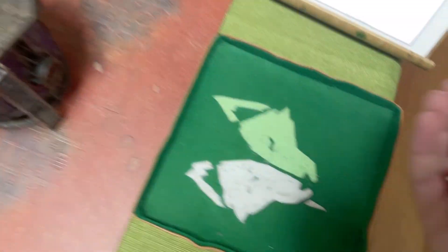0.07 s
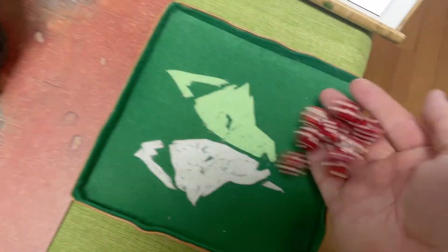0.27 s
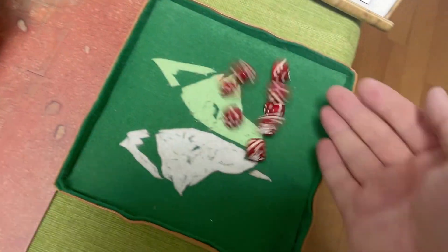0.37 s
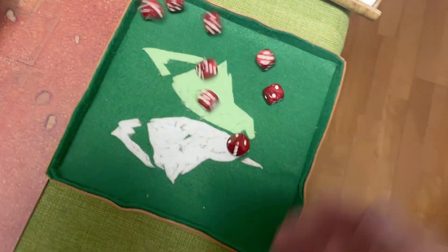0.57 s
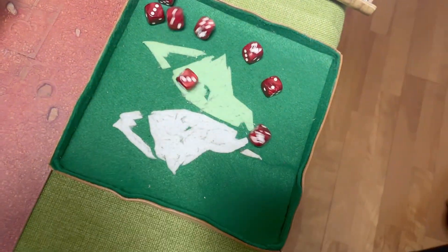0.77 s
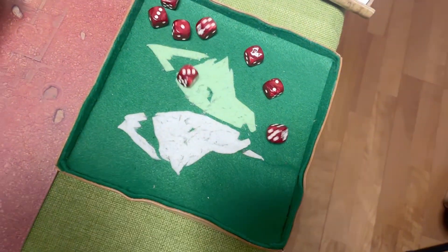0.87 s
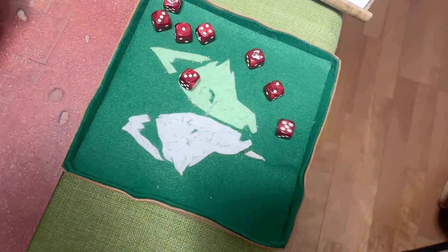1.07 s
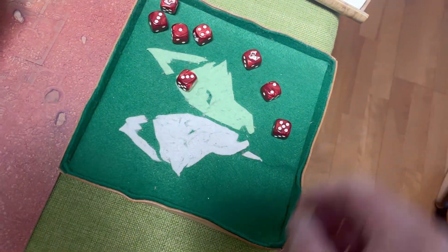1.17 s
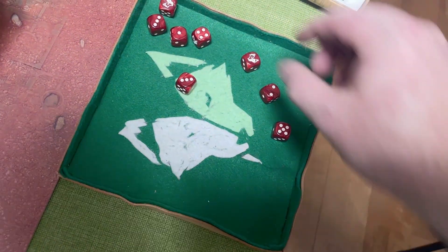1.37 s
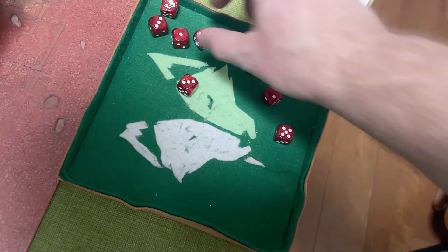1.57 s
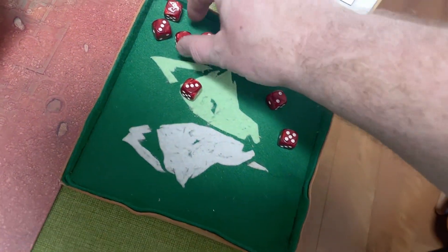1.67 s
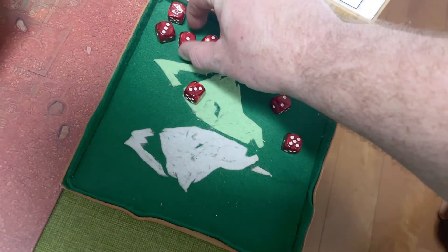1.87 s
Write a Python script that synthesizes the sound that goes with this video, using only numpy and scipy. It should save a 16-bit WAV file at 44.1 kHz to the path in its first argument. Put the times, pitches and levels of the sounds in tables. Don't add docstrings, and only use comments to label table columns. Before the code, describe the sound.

Plastic dice clack briefly in a palm, then spill onto a felt mat with sharp clicks, soft woody thuds and hard knocks, settling quickly; later an arm rustles and bumps furniture. Small quiet room, close stereo microphone.

```python
import sys
import numpy as np
from scipy import signal
from scipy.fft import rfft, irfft
from scipy.io import wavfile

SR = 44100
rng = np.random.default_rng(int(sys.argv[2]) if len(sys.argv) > 2 else 0)


def gain_from_db(level_db):
    decades = np.asarray(level_db, float) / 20
    return 10 ** decades


def dump_mix(stems):
    frames = np.atleast_2d(stems).T
    limited = np.clip(frames, -1, 1)
    pcm = np.round(limited * 32767).astype(np.int16)
    wavfile.write(sys.argv[1], SR, pcm)


N = 83790


def in_time(rows):
    return gain_from_db(np.interp(np.arange(N) / SR, *np.transpose(rows)))


def at_hz(points, hz):
    table_hz, value = np.transpose(points)
    return np.interp(np.log(hz + 1), np.log(table_hz + 1), value)


def rms_one(x):
    return x / np.sqrt(np.mean(x ** 2) + 1e-20)


def passed(x, kind, hz, order):
    return signal.sosfilt(signal.butter(order, hz, kind, fs=SR, output="sos"), x)


def rings(hz, t60_s, size):
    t = np.arange(size) / SR
    decay = gain_from_db(-60 * t / np.reshape(t60_s, (-1, 1)))
    return np.sin(2 * np.pi * np.reshape(hz, (-1, 1)) * t) * decay


def push(hz):
    force = np.hanning(int(SR / hz / 2) + 3)
    return force / force.sum()


def place(rows, shape):
    out = np.zeros(N + SR)
    for start_s, peak_db, *hz in rows:
        x = shape(*hz)
        start = int(start_s * SR)
        out[start:start + len(x)] += gain_from_db(peak_db) * x / np.abs(x).max()
    return out[:N]


def grains():
    lumps = np.minimum(rng.exponential(1, N // 60 + 1), 4)
    return rng.standard_normal(N) * gain_from_db(0.98 * lumps.repeat(60)[:N])


def diffuse(a, b, colour):
    # freq_hz, likeness [0..1]
    likeness = [(60, 1), (300, .8), (700, .3), (5500, .1), (7600, .8), (8700, .998), (9400, .99),
                (11500, .6), (13500, .99)]
    alike = np.clip(at_hz(likeness, np.fft.rfftfreq(2 * N, 1 / SR)), 0, 1)
    mid = np.sqrt(1 + alike) * a
    side = np.sqrt(1 - alike) * b * [[1], [-1]]
    return irfft(colour * (mid + side), 2 * N)[:, :N]


def noise(spectrum):
    a, b = rfft(rng.standard_normal((2, 2 * N)))
    return rms_one(diffuse(a, b, gain_from_db(at_hz(spectrum, np.fft.rfftfreq(2 * N, 1 / SR)))))


def clack(hz):
    size, cycles, scatter_db, scatter_t60_s = 300, 8.2, -27, .018
    vary = rng.uniform(-1, 1, 8)
    mode_hz = np.array([hz, hz * .72, 12400, hz * .42, 7800]) * (1 + .07 * vary[:5])
    mode_db = [0, -8, -10 + 3 * vary[5], -19.5, -6.0]
    t60_s = cycles * np.array([0.89, 0.44, 0.65, 0.45, 1]) / mode_hz
    x = gain_from_db(mode_db) @ rings(mode_hz, t60_s, size)
    x *= 1 - np.exp(-np.arange(size) * hz / SR)
    t = np.arange(600) / SR
    path = rng.standard_normal(600) * gain_from_db(scatter_db - 60 * t / scatter_t60_s)
    path[:25] = np.arange(25) == 0
    return passed(np.convolve(x, path), "high", 1200, order=4)


def palm_clacks():
    # start_s, peak_db, centre_hz
    palm_hits = [(0.0955, -34.3, 6700), (0.17, -21.5, 4580), (0.1719, -35.1, 4820), (0.1754, -32.3, 4390),
                 (0.178, -21.4, 6550), (0.1816, -36.2, 4610), (0.1841, -24.7, 5040), (0.1888, -28.8, 4940),
                 (0.1932, -33.1, 4760), (0.1949, -34.5, 5140), (0.1985, -25.8, 4720), (0.2001, -17.6, 4820),
                 (0.2059, -9.4, 5800), (0.2071, -15.0, 6840), (0.2095, -15.6, 5940), (0.2117, -29.2, 5600),
                 (0.2139, -29.2, 4920), (0.2156, -21.6, 5410), (0.2175, -30.3, 6590), (0.2186, -29.1, 6110),
                 (0.2212, -16.3, 6320), (0.2229, -26.7, 6040), (0.2244, -16.1, 4780), (0.2314, -20.0, 6560),
                 (0.2398, -26.9, 6020), (0.2413, -28.0, 5710), (0.2444, -8.8, 5510), (0.2548, -24.8, 7320),
                 (0.2587, -19.0, 6600), (0.2622, -27.0, 5680), (0.2637, -31.7, 6810), (0.2736, -31.4, 6080),
                 (0.2772, -33.1, 6560), (0.2784, -34.6, 5730)]
    return gain_from_db(5.5) * place(palm_hits, clack)


def mat_clacks():
    # start_s, peak_db, centre_hz
    mat_hits = [(0.3163, -19.7, 6120), (0.3188, -21.1, 6370), (0.322, -28.5, 5260), (0.3333, -11.5, 7150),
                (0.3388, -28.3, 6780), (0.3432, 0.3, 8240), (0.3443, 0.0, 7770), (0.3509, -18.8, 7870),
                (0.3528, -10.5, 7780), (0.3559, -19.7, 8540), (0.3594, -12.1, 7990), (0.3654, -7.0, 7600),
                (0.3688, -19.1, 7530), (0.3737, -22.8, 7580), (0.3771, -21.4, 7230), (0.3813, -23.1, 7000),
                (0.3829, -22.5, 8230), (0.3871, -8.7, 7200), (0.3891, -20.9, 7620), (0.3942, -1.3, 8260),
                (0.3963, -15.8, 8310), (0.3974, -22.6, 7320), (0.3989, -24.8, 7610), (0.4022, -22.9, 8050),
                (0.4039, -16.8, 8320), (0.4069, -21.5, 8100), (0.4094, -22.0, 8610), (0.4125, -23.6, 8430),
                (0.4135, -25.0, 8710), (0.4193, -25.3, 8470), (0.423, -27.2, 8140), (0.4323, -26.8, 8480),
                (0.5315, -11.9, 6980), (0.5412, -30.6, 6530), (0.564, -32.6, 3670), (0.5968, -19.6, 6050),
                (0.6633, -22.3, 6640), (0.6801, -18.1, 8410), (0.6849, -11.4, 8030), (0.6944, -31.1, 7130)]
    return gain_from_db(5.5) * place(mat_hits, clack)


def landing(hz):
    # freq_hz, level_db, t60_s
    table_modes = [(55.2, -21.5, 0.17), (70.53, -14, 0.78), (130.7, -4.5, 0.28), (163.3, -4, 0.15),
                   (210.5, 0, 0.053), (262, -9, 0.047), (323, -7, 0.017), (342, -13, 0.093),
                   (390, -19.5, 0.047)]
    mode_hz, mode_db, t60_s = np.transpose(table_modes)
    strength = gain_from_db(mode_db - 8.5 + rng.normal(0, 4, len(mode_hz)))
    x = -strength @ rings(mode_hz, t60_s, size=20000)
    x -= gain_from_db(-11) * rings(hz, 3.7 / hz, size=20000)[0]
    return signal.fftconvolve(x, push(hz * 2.4))


def landings():
    # start_s, peak_db, push_hz
    felt_hits = [(.3115, -14, 248), (.3245, -14, 308), (.3303, -13.5, 228), (.3365, -18, 258),
                 (.3595, -9.5, 280), (.366, -25, 175), (.3975, -19.5, 300), (.4035, -17.5, 187),
                 (.419, -18, 200), (.431, -18, 190), (.4505, -25.5, 227), (.4555, -27, 233.4),
                 (.4605, -23, 197), (.471, -30, 160.5), (.4915, -20, 230), (.5165, -35, 340),
                 (.5245, -23, 177), (.5675, -17, 206), (.6215, -44, 205), (.6435, -35, 198),
                 (.676, -30.5, 286), (.697, -33, 220), (.726, -41, 209), (.765, -44, 173)]
    return place(felt_hits, landing)


def knock(hz):
    t60_s = 0.02 * 1300 / hz * np.array([1, .6, .4])
    x = gain_from_db([0, -13, -12]) @ rings(hz * np.array([1, .62, 1.55]), t60_s, size=4000)
    return np.convolve(x, push(hz * 3))


def knocks():
    # start_s, peak_db, ring_hz
    corner_hits = [(.308, -19.5, 1310), (.351, -17, 1446), (.385, -12.5, 1278), (.483, -23, 1295),
                   (.512, -31, 530), (.563, -22, 1340), (.567, -25, 262), (.789, -31.5, 5760),
                   (.8555, -43, 2077), (.859, -47, 2700), (.882, -54, 4040), (1.498, -57, 1146)]
    return place(corner_hits, knock)


def thud():
    spread_s, top_hz = 0.1331, 330
    hz = np.fft.rfftfreq(4096, 1 / SR)
    lag_rad = 4 * np.pi * spread_s * np.sqrt(hz) - 2 * np.pi * hz * spread_s / 50
    gain = hz / (hz + 150) / (1 + (hz / top_hz) ** 2)
    return irfft(np.exp(-1j * lag_rad) * gain)[:2000]


def thuds():
    # start_s, peak_db
    board_hits = [
        (.308, -26),
        (.385, -23),
        (.563, -28),
    ]
    return place(board_hits, thud)


def tumble():
    # start_s, level_db
    tumble_curve = [(.3, -104), (.45, -58), (.64, -55), (.86, -62), (.94, -98.5)]
    centre_hz, width_hz = 1690, 140
    drag = grains()

    def band(lo_hz, hi_hz):
        return rms_one(passed(drag, "band", [lo_hz, hi_hz], order=2))

    resonance = band(centre_hz - width_hz / 2, centre_hz + width_hz / 2)
    hiss = gain_from_db(-1.5) * band(1300, 2000)
    patter = gain_from_db(-10.5) * band(220, 440)
    return in_time(tumble_curve) * (resonance + hiss + patter)


def bump(hz):
    # freq_hz, level_db, t60_s
    furniture_modes = [(355, 5, 0.069), (480, 1, 0.04), (590, 2, 0.03), (690, -2, 0.05), (945, -2, 0.035),
                       (1130, -3, 0.035), (1400, -7, 0.02), (1765, -1, 0.03), (2120, 3, 0.04),
                       (3140, -4, 0.04), (3610, -2, 0.03), (5310, -6, 0.04), (5750, -10, 0.05)]
    mode_hz, mode_db, t60_s = np.transpose(furniture_modes)
    count = len(mode_hz)
    vary = rng.normal(0, 1, (2, count))
    sign = np.where(mode_hz < 500, 1, rng.choice([-1, 1], count))
    strength = gain_from_db(mode_db + 2.5 * vary[0]) * sign
    x = strength @ rings(mode_hz * (1 + .015 * vary[1]), np.minimum(t60_s, .05), size=3000)
    x = np.convolve(passed(x, "high", 310, order=4), push(hz * 3.8))
    stutter = rng.standard_normal(400) ** 3 * np.exp(-np.arange(400) / 30)
    return np.convolve(x, stutter)


def bumps():
    # start_s, peak_db, hardness_hz
    arm_hits = [(1.1229, -23, 1500), (1.125, -22, 450), (1.143, -26, 500), (1.5835, -28, 900),
                (1.586, -15, 1700), (1.588, -12, 900), (1.592, -21, 1300), (1.6025, -13, 1200),
                (1.605, -18, 900), (1.617, -20, 500), (1.634, -20, 400)]
    return gain_from_db(-3) * np.array([place(arm_hits, bump) for _ in "LR"])


def shove(hz):
    x = gain_from_db([0, -6]) @ rings([hz, hz * 1.375], [.13, .1], size=9000)
    return np.convolve(x, push(hz * 1.255))


def shoves():
    # start_s, peak_db, push_hz
    weight_hits = [
        (1.126, -29, 106.3),
        (1.59, -27.5, 80.6),
        (1.612, -28, 87.4),
    ]
    return place(weight_hits, shove)


def brush():
    # start_s, level_db
    brush_curve = [(1.03, -99.5), (1.08, -71.5), (1.12, -54.5), (1.17, -62.5), (1.28, -95.5), (1.575, -82),
                   (1.588, -41), (1.64, -34), (1.71, -44), (1.78, -65.5), (1.88, -100.5)]
    # freq_hz, density_db_per_hz
    cloth_colour = [(120, -20.5), (200, -23), (3600, -29.5), (7970, -31), (9050, -25), (12700, -36),
                    (15000, -42.5)]
    creak = [rms_one(signal.fftconvolve(grains(), np.diff(bump(4000)))[:N]) for _ in "LR"]
    creak = passed(np.array(creak), "low", 6800, order=4)
    return in_time(brush_curve) * (noise(cloth_colour) + gain_from_db(-2) * creak)


def rustle():
    # start_s, level_db
    rustle_curve = [(0, -59.5), (.07, -65.5), (.16, -68.5), (.85, -93), (.858, -59), (.91, -81), (.94, -92),
                    (1.04, -79), (1.1, -52), (1.15, -55.5), (1.23, -70.5), (1.3, -117), (1.395, -86),
                    (1.41, -66), (1.47, -74), (1.5, -85)]
    friction = passed(np.array([grains(), grains()]), "band", [1000, 2700], order=2)
    return in_time(rustle_curve) * rms_one(friction)


def rumble():
    # start_s, level_db
    rumble_curve = [(0, -73), (.1, -64), (.29, -77), (.33, -28), (.6, -45), (.88, -70.5), (.97, -60.5),
                    (1.04, -71), (1.15, -47), (1.33, -77), (1.56, -69), (1.63, -52.5), (1.82, -62.5),
                    (1.9, -82)]
    return in_time(rumble_curve) * rms_one(passed(rng.standard_normal(N), "band", [50, 190], order=2))


def room(x):
    # freq_hz, t60_s
    room_decay = [(100, 0.13), (900, 0.38), (5000, 0.19), (14000, 0.27)]
    first_echo_s = 0.0057
    t = np.arange(SR // 2) / SR
    edges_hz = 60 * 2 ** np.arange(0, 8.6, .5)
    white = rng.standard_normal((2, 2, len(t)))
    echoes = 0
    for k, (lo_hz, hi_hz) in enumerate(zip(edges_hz, edges_hz[1:])):
        decay = gain_from_db(-60 * t / max(at_hz(room_decay, lo_hz), .05))
        echoes = echoes + passed(white[k % 2], "band", [lo_hz, hi_hz], order=2) * decay
    echoes *= np.clip(t / first_echo_s - 1, 0, 1)
    return diffuse(*rfft(rms_one(echoes) / 250, 2 * N), rfft(x, 2 * N))


def floor():
    # freq_hz, density_db_per_hz
    floor_colour = [(24, -40.5), (45, -2), (355, -13.5), (804, -21), (1700, -20.5), (3500, -30),
                    (8000, -25.5), (12600, -23.5), (15000, -42)]
    # start_s, level_db
    floor_curve = [(0, -64), (.16, -65.5), (.9, -70), (1.3, -70.5), (1.9, -70)]
    return in_time(floor_curve) * noise(floor_colour)


def scene():
    near = palm_clacks() + mat_clacks() + knocks() + tumble()
    low = landings() + shoves() + thuds() + rumble()
    far = bumps()
    wet = room(gain_from_db(-7.5) * near + gain_from_db(-15) * low + gain_from_db(-9) * far[0])
    aside = gain_from_db(-6.0) * passed(mat_clacks(), "band", [2800, 5600], order=2) * [[1], [-1]]
    return near + aside + low + far + wet + brush() + rustle() + floor()


def roll_off(x):
    return signal.sosfilt(signal.butter(12, 15170, fs=SR, output="sos"), x)


def record(dry):
    # freq_hz, left_lead_rad
    port_phase = [(300, 0), (2400, .4), (3500, .9), (4900, .7), (5800, -2), (7000, -2.1), (8700, -3.14),
                  (10200, -3.6), (13300, -6.2)]
    # freq_hz, left_minus_right_db
    port_balance = [(60, 3), (500, 2), (4000, 2), (8000, -.7)]
    hz = np.fft.rfftfreq(2 * N, 1 / SR)
    half = gain_from_db(at_hz(port_balance, hz) / 2) * np.exp(.5j * at_hz(port_phase, hz))
    x = irfft(rfft(dry, 2 * N) * np.array([half, 1 / half]), 2 * N)[:, :N]
    x = passed(x, "high", 41, order=4)
    x = passed(x, "low", 14900, order=8)
    return roll_off(np.clip(x, -1, 1))


dry = scene()
out = record(dry)
dump_mix(out)
```